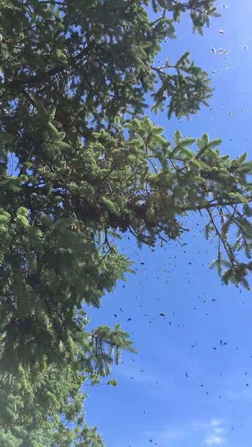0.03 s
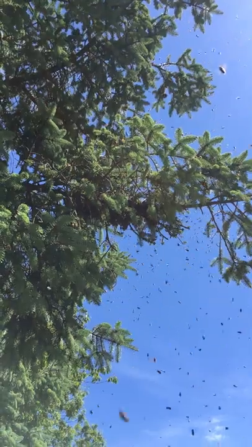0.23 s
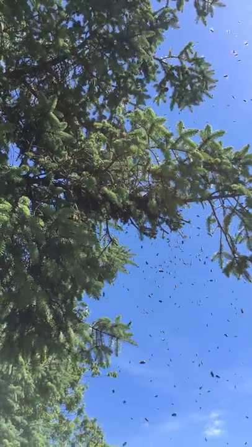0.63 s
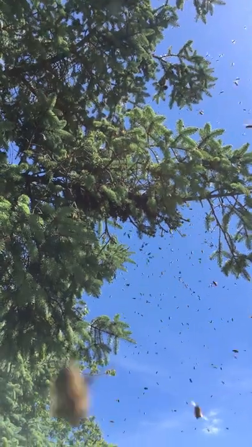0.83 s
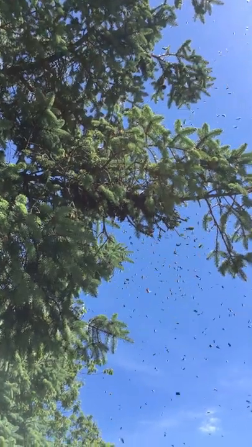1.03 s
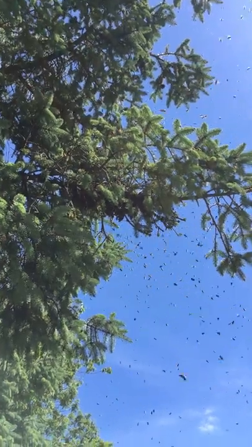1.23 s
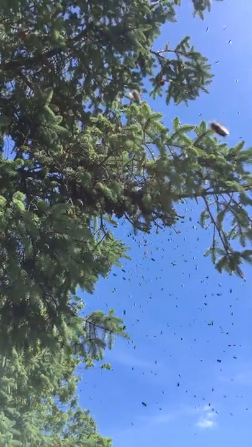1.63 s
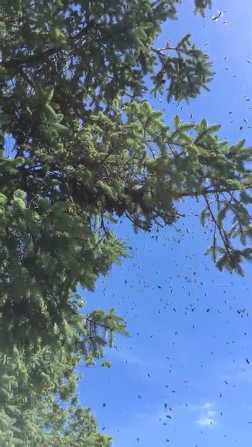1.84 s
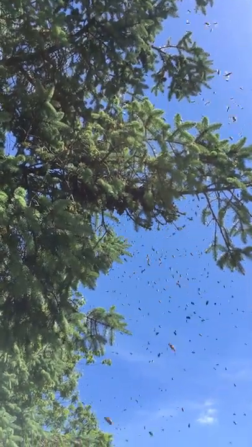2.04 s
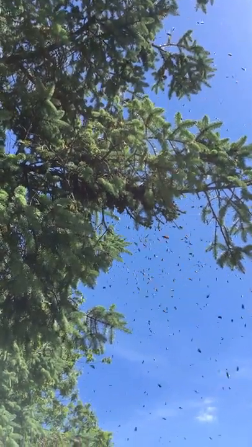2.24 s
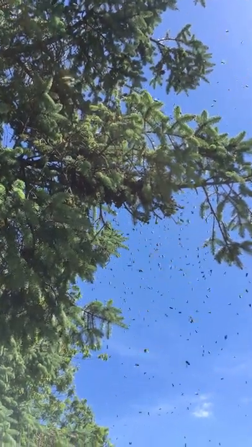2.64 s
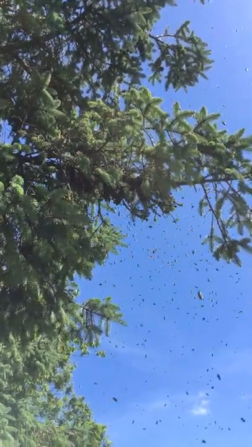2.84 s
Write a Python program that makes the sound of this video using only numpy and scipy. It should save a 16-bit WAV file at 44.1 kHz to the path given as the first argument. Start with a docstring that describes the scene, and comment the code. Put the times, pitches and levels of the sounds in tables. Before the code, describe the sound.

Dozens of honeybees make a steady low buzz a little way off, beside a tree. One ticks against the microphone and another swells past it, then the drone carries on, with faint high bird whistles and light outdoor hiss behind.

```python
"""Beside a conifer, with honeybees milling around it; everything is heard in the centre.
A little way off, dozens of wingbeats near one pitch blend into a steady drone.
Right at the microphone, one bee bumps the case with a tick and another flies close past.
Farther back, small birds give thin, high calls among the branches, over faint air noise and hiss."""
import sys
import numpy as np
from scipy import signal
from scipy.fft import rfft, irfft, next_fast_len
from scipy.io import wavfile
from scipy.ndimage import map_coordinates

SR = 44100
rng = np.random.default_rng(int(sys.argv[2]) if len(sys.argv) > 2 else 0)


def int16_out(signal):
    """Quantize to a 16-bit WAV file."""
    q = np.round(np.clip(np.atleast_2d(signal).T, -1, 1) * 32767)
    wavfile.write(sys.argv[1], SR, q.astype(np.int16))


N = 132300
TIME = np.arange(N) / SR


def amp(db):
    """Decibels to gain."""
    return 10 ** (np.asarray(db) / 20)


def unit(x):
    """Scale to rms 1."""
    return x / np.sqrt(np.mean(x ** 2) + 1e-20)


def along(points, x):
    """Read (position, value) points at x on a log axis."""
    positions, values = np.transpose(points)
    return np.interp(np.log(x + 1e-9), np.log(positions), values)


def wobble(per_s):
    """A smooth curve through per_s random knots a second."""
    coarse = TIME[::32]
    knots = rng.standard_normal(1024)
    return np.interp(TIME, coarse, map_coordinates(knots, [coarse * per_s + 2], mode="wrap"))


def filtered(x, response):
    """Filter x by a gain given as a function of frequency."""
    size = next_fast_len(N + SR // 2)
    return irfft(rfft(x, size) * response(np.fft.rfftfreq(size, 1 / SR)), size)[..., :N]


def noise(spectrum):
    """Noise of rms 1, coloured by (f/Hz, level/dB) points."""
    return unit(filtered(rng.standard_normal(N), lambda hz: amp(along(spectrum, hz))))


def cycles(hz):
    """Cycles completed at a moving pitch."""
    return np.cumsum(hz) / SR


def air(level_db=-52.5):
    """The faint bed of open air and microphone hiss."""
    # noise spectrum: f/Hz, relative level/dB
    spectrum = [(15, -35), (33, 1), (60, 9), (88, 1), (165, 5), (330, 4), (1000, 4.5), (3000, -7),
                (4200, -6.5), (4850, -11), (5800, -3.5), (7200, -4.5), (9300, -1.5), (10400, -5.5),
                (11500, -0.3), (13000, 0.2), (15800, -1.5)]
    return amp(level_db) * noise(spectrum)


def birds(quaver_per_s=130, quaver_db=3):
    """Small birds in the background: thin whistles that glide, quaver, swell and fade."""
    # calls: start t/s, length/s, start f/Hz, end f/Hz, level/dB, quaver/share of the pitch
    calls = [(.03, .385, 8400, 7650, -58.5, .001), (1.04, .075, 7400, 7450, -64, .005),
             (2.45, 0.096, 7560, 7520, -57, .008), (2.54, 0.068, 7600, 7620, -55, 0.011),
             (2.445, 0.187, 8640, 8720, -61, .005)]
    out = np.zeros(N)
    for start, length, from_hz, to_hz, db, quaver in calls:
        progress = np.clip((TIME - start) / length, 0, 1)
        hz = (from_hz + (to_hz - from_hz) * progress) * (1 + quaver * wobble(quaver_per_s))
        swell = np.sqrt(np.abs(np.sin(np.pi * progress ** 1.47)))
        gain = np.sqrt(2) * amp(db + quaver_db * wobble(quaver_per_s))
        out += gain * swell * np.sin(2 * np.pi * cycles(hz))
    return out


def branch_echo(x, echo_db=-10.5, t60_s=0.29):
    """The direct sound plus a short, diffuse echo scattered by the branches."""
    t = TIME[:SR // 2]
    tail = rng.standard_normal(len(t)) * amp(-60 * t / t60_s)
    return x + amp(echo_db) * signal.fftconvolve(x, tail / np.linalg.norm(tail))[:N]


def far_bee(wingbeat_hz, wander=.04, distance_swing_db=3.5, order=28, size=4096):
    """A bee some way off: one wing stroke repeats at a wandering rate, its level moving with distance."""
    # wing harmonics: multiple of the wingbeat, relative level/dB
    far_wings = [(1, 0.5), (2, 3), (3, -6.5), (4, -2), (5, -3.5), (6, -4.5), (8, -12), (11, -14), (16, -22),
                 (28, -30.5)]
    harmonic_db = along(far_wings, np.arange(1, order + 1)) + rng.normal(0, 1.7, order)
    harmonics = amp(harmonic_db) * np.exp(2j * np.pi * rng.random(order))
    stroke = unit(irfft(np.r_[0, harmonics], size))
    beats = cycles(wingbeat_hz * (1 + wander * wobble(5) + .01 * wobble(30)))
    buzz = stroke[(beats * size).astype(int) % size]
    return buzz * amp(distance_swing_db * wobble(5.026))


def swarm(count=64, mean_hz=238, spread=.066, level_db=-48.5):
    """The drone around the tree: many bees, their wingbeats spread in a bell around the mean."""
    rank = (np.arange(count) + .5) / count
    bell = unit(np.arcsin(2 * rank - 1))
    wingbeats_hz = mean_hz * (1 + spread * bell)
    return amp(level_db) * unit(sum(far_bee(hz) for hz in wingbeats_hz))


def near_bee(flight, jitter, turn_per_s=22, turn_db=2, turn_rad=0.12, order=28):
    """A bee at the microphone: clear overtones that shift as it turns, and air swished by each stroke."""
    # wing harmonics: multiple of the wingbeat, relative level/dB
    near_wings = [(1, -1.5), (2, -3), (3, -12), (4, -11.5), (5, -13.5), (6, -22), (7, -16), (9, -29.5),
                  (12, -37.5), (20, -40), (28, -41)]
    # hiss of air over the wings: f/Hz, relative level/dB
    wing_hiss = [(500, -20), (1500, 10.5), (4000, -7.5), (8000, -4.5), (13000, -1.5), (16000, -8)]
    # air pushed onto the microphone: f/Hz, relative level/dB
    downwash_spectrum = [(20, -22), (60, 1.5), (130, -12), (350, 1.5), (1000, -27.5)]
    times, hz, fundamental_db, overtone_db = np.transpose(flight)
    phase = 2 * np.pi * cycles(np.interp(TIME, times, hz) * (1 + jitter * wobble(120)))
    present = (TIME > times[0]) & (TIME < times[-1])
    fundamental_gain = amp(np.interp(TIME, times, fundamental_db)) * present
    overtone_gain = amp(np.interp(TIME, times, overtone_db)) * present
    tone = np.zeros(N)
    for k in range(1, order + 1):
        gain = fundamental_gain if k == 1 else overtone_gain * amp(turn_db * wobble(turn_per_s))
        turned_phase = phase + turn_rad * wobble(turn_per_s)
        tone += gain * amp(along(near_wings, k)) * np.sin(k * turned_phase + 2 * np.pi * rng.random())
    swish = overtone_gain * unit((1 + 0.66 * np.sin(phase)) * noise(wing_hiss))
    # squared, so the downwash is heard mainly when the bee is nearest
    downwash = fundamental_gain ** 2 / fundamental_gain.max() * noise(downwash_spectrum)
    return np.sqrt(2) * tone + amp(-15.5) * swish + amp(-18) * downwash


def bump(at_s=.4535, crack_t60_s=0.0048, ring_lag_s=0.000494, puff_rise_s=0.0068):
    """A bee strikes the microphone's case: a crack, a very short ring and a low puff."""
    # modes of the case: f/Hz, level/dB, t60/s
    case_modes = [(2360, -26.5, 0.0047), (1730, -27.5, 0.003), (3910, -33.5, 0.0024), (5800, -34, 0.0036)]
    # spectrum of the puff: f/Hz, relative level/dB
    puff_spectrum = [(20, -13), (70, -7), (170, -3), (400, -6), (1000, -31)]
    t = np.maximum(TIME - at_s, 0)
    bright_noise = noise([(1000, -27), (3000, 5.5), (14000, 0)])
    crack = (t > 0) * amp(-30 - 60 * t / crack_t60_s) * bright_noise
    ring_t = np.maximum(t - ring_lag_s, 0)
    ring = sum(amp(db - 60 * ring_t / t60) * np.sin(2 * np.pi * hz * ring_t)
               for hz, db, t60 in case_modes)
    puff = amp(-50.5) * t / puff_rise_s * np.exp(1 - t / puff_rise_s) * noise(puff_spectrum)
    return crack + ring + puff


def scene():
    """Bees in front, birds and air behind, the same in both channels."""
    # the bee that flies close past: t/s, wingbeat f/Hz, fundamental gain/dB, overtone gain/dB
    close_pass = [(.675, 262, -58, -72), (.697, 261.7, -36, -41), (.715, 255.7, -38.5, -44),
                  (.74, 260.7, -35, -37), (.78, 259.6, -35, -38.5), (.808, 251.1, -28.5, -36.5),
                  (.835, 250.6, -35, -41.5), (.856, 263.5, -37.5, -34), (.875, 261.3, -43, -42.5),
                  (.91, 254, -64, -47)]
    # the bee that bumps the microphone: same columns
    bump_flight = [(.40, 225, -60, -60), (.425, 222.4, -45, -43), (.448, 225.7, -76, -48),
                   (.461, 235, -41, -42.5), (.476, 252, -53, -45.5), (.495, 243, -55, -53)]
    bees = swarm() + near_bee(close_pass, jitter=0.0089)
    bees += near_bee(bump_flight, jitter=0.0596) + bump()
    centre = bees + branch_echo(birds()) + air()
    return np.array([centre, centre])


def record(dry, silence_s=.035, top_hz=16080):
    """A brief silence, then the sound begins; nothing is heard above top_hz."""
    return filtered(dry * (TIME > silence_s), lambda hz: hz < top_hz)


dry = scene()
out = record(dry)
int16_out(out)
```